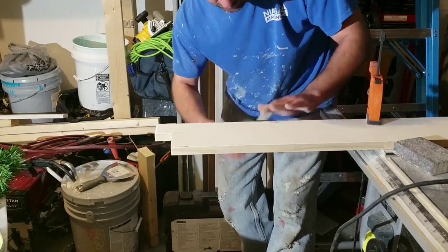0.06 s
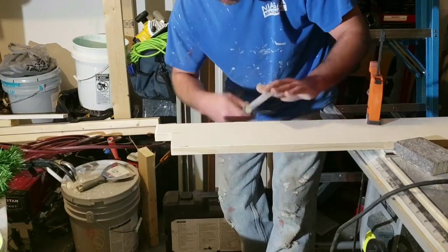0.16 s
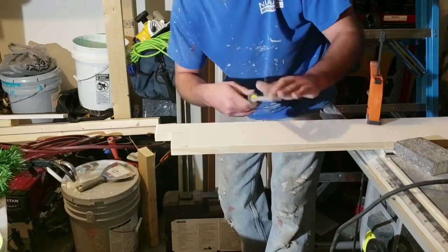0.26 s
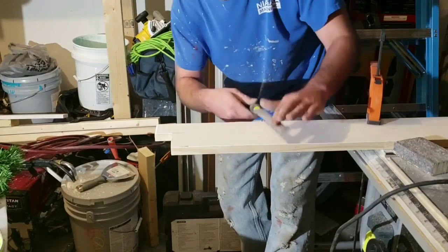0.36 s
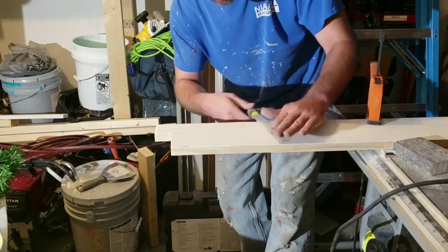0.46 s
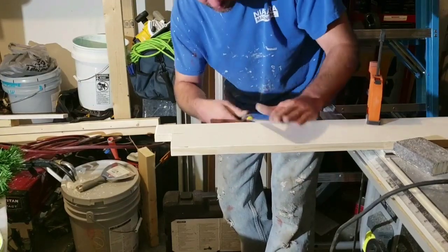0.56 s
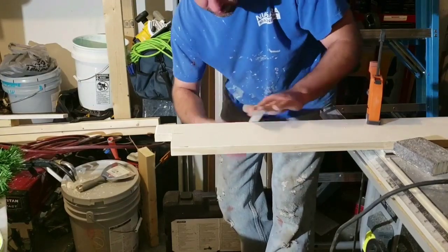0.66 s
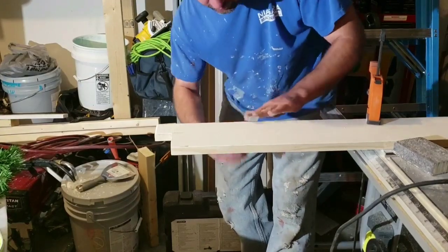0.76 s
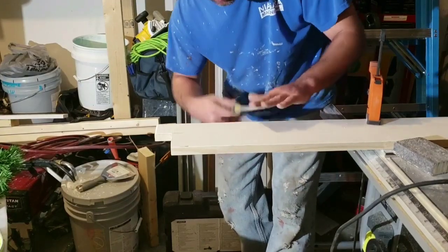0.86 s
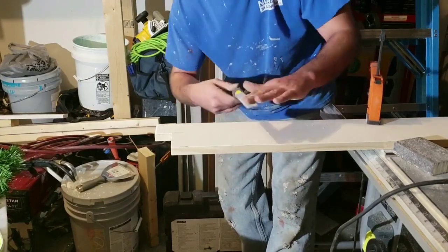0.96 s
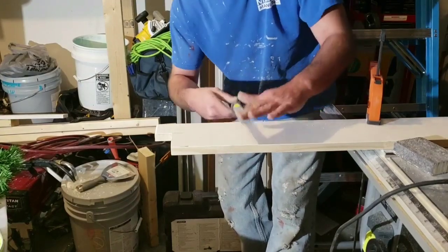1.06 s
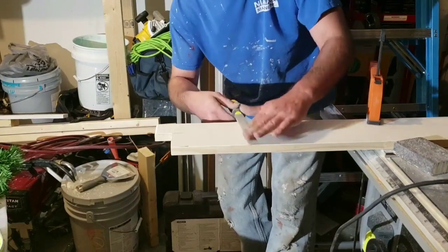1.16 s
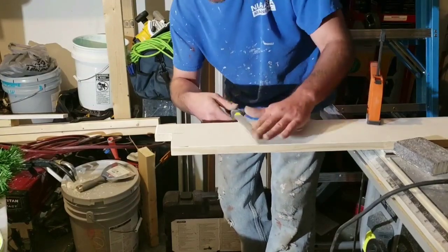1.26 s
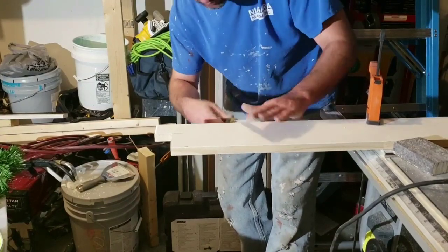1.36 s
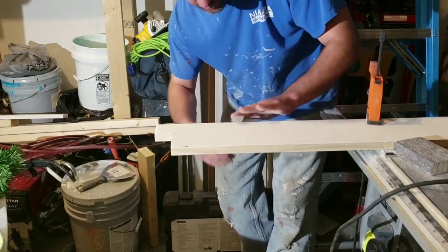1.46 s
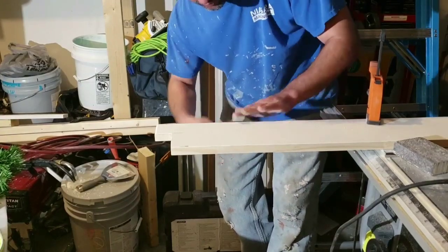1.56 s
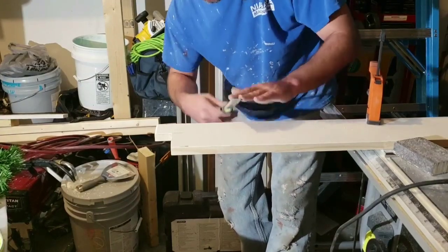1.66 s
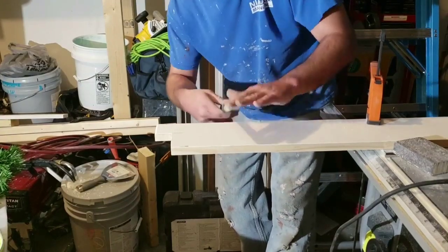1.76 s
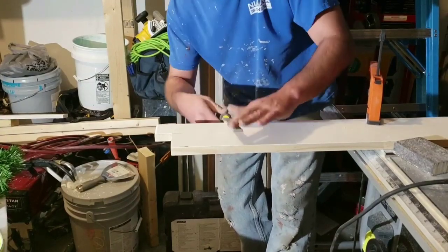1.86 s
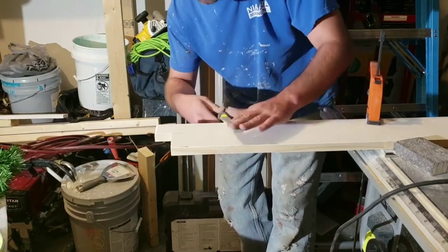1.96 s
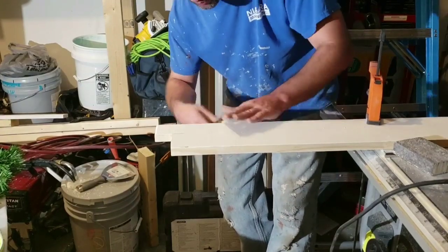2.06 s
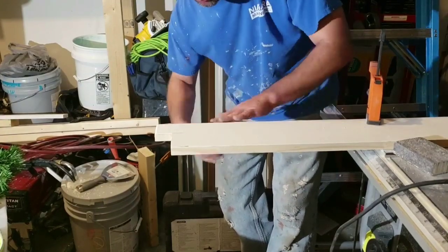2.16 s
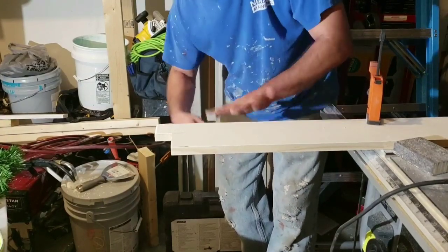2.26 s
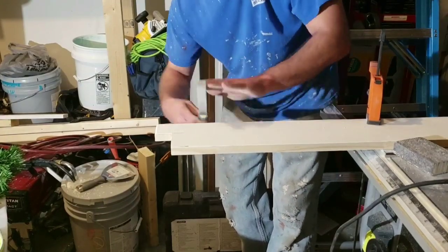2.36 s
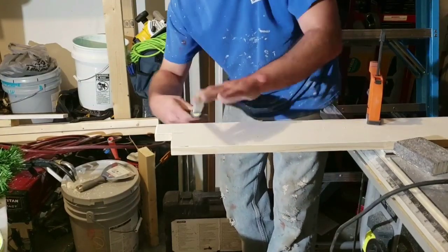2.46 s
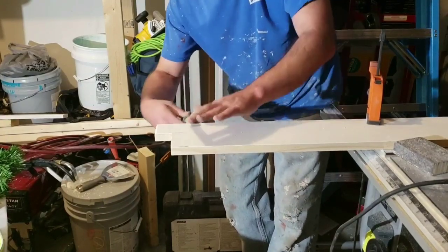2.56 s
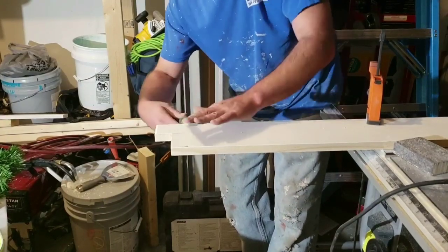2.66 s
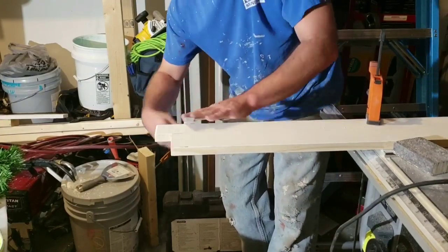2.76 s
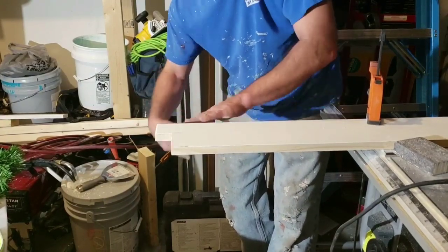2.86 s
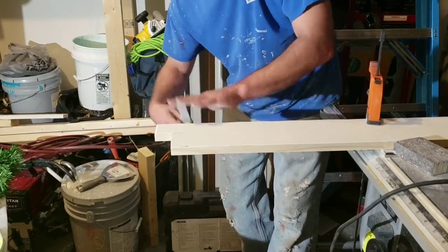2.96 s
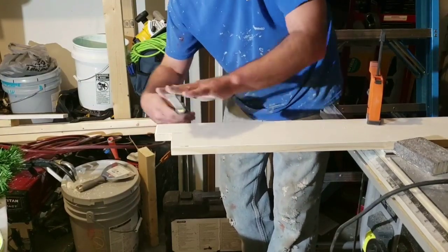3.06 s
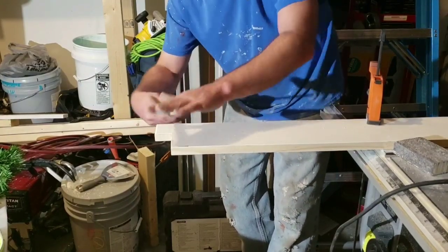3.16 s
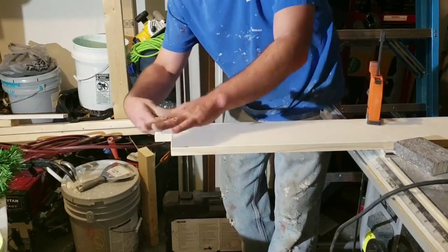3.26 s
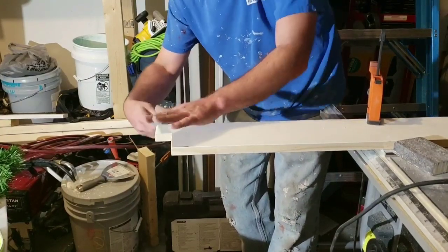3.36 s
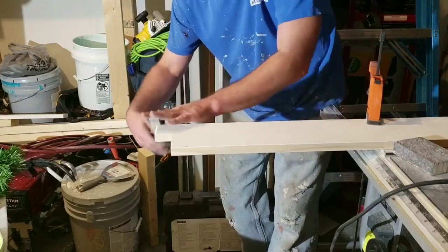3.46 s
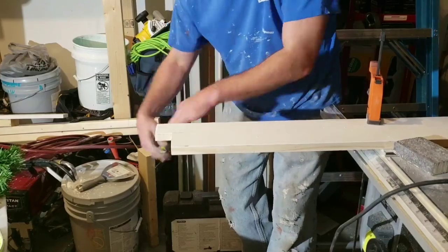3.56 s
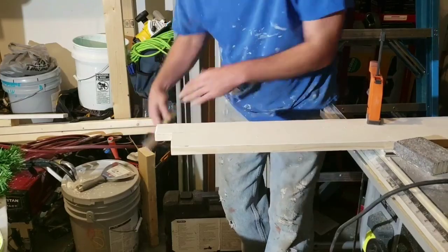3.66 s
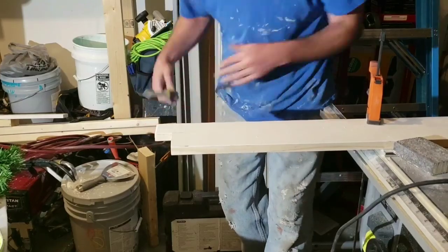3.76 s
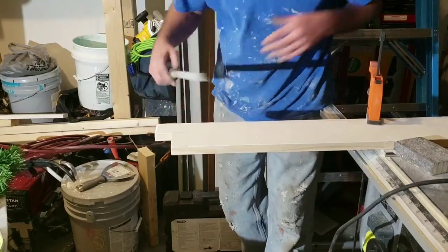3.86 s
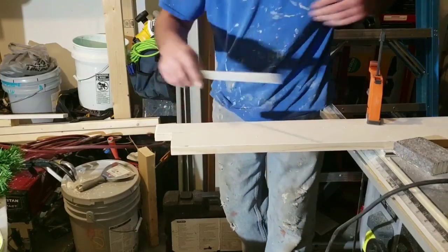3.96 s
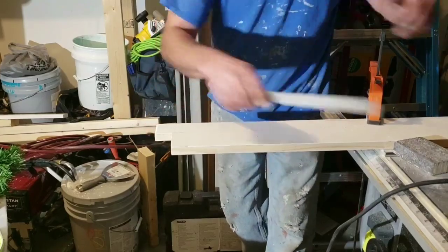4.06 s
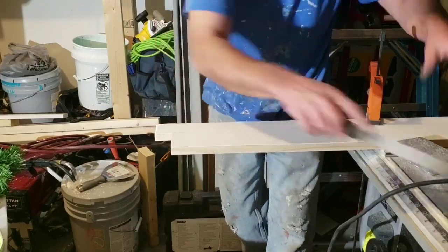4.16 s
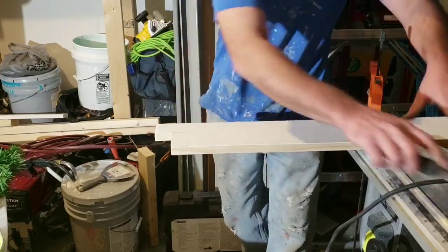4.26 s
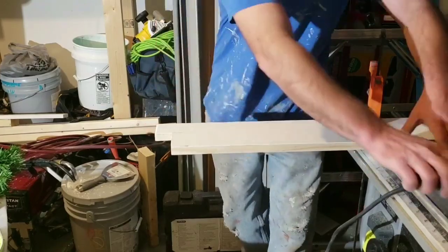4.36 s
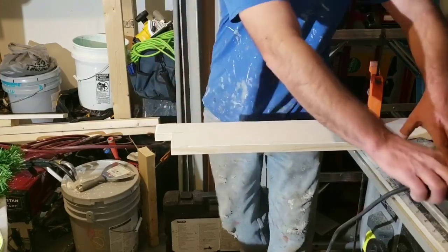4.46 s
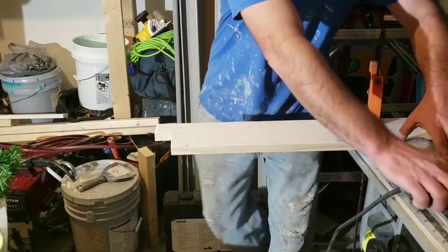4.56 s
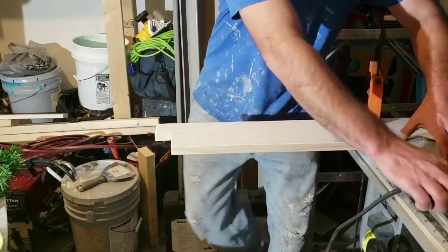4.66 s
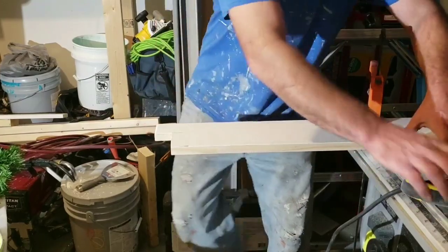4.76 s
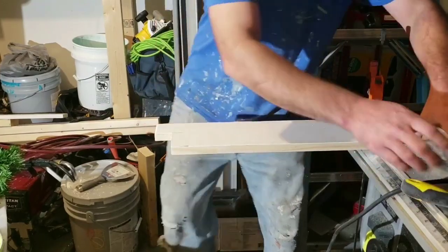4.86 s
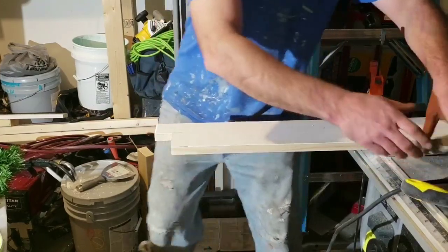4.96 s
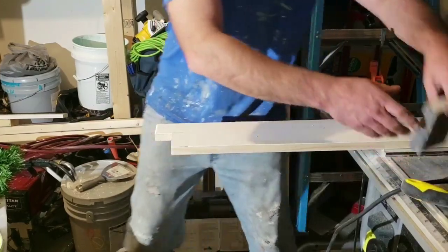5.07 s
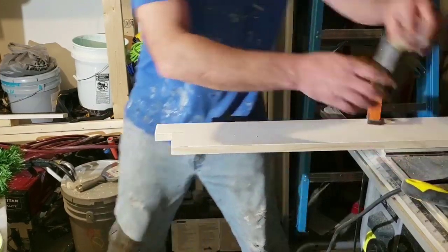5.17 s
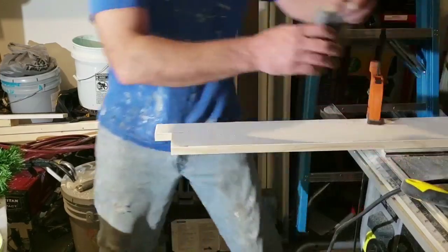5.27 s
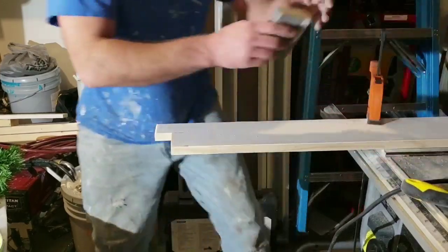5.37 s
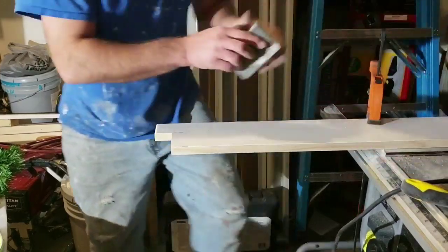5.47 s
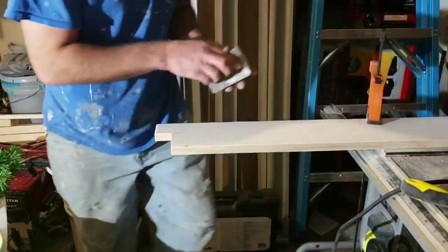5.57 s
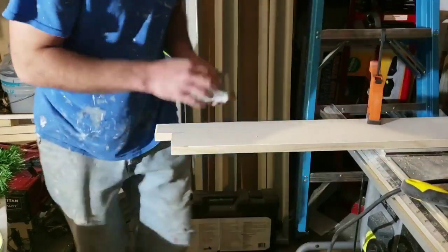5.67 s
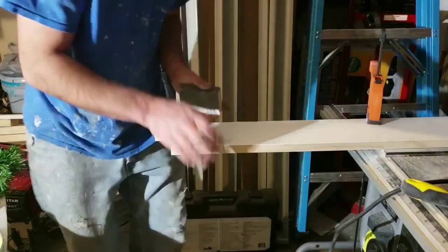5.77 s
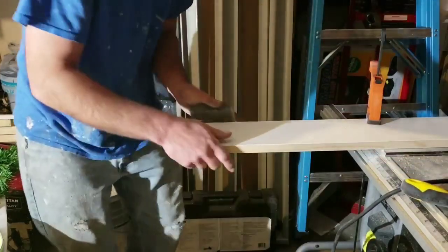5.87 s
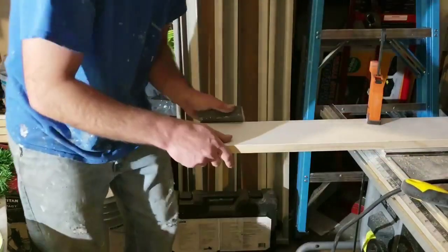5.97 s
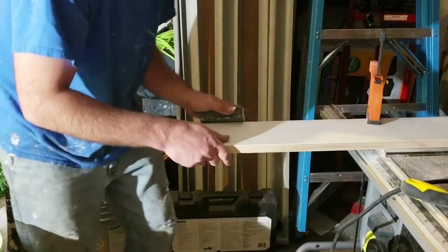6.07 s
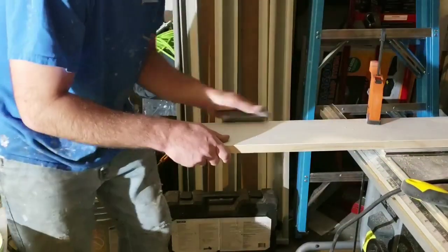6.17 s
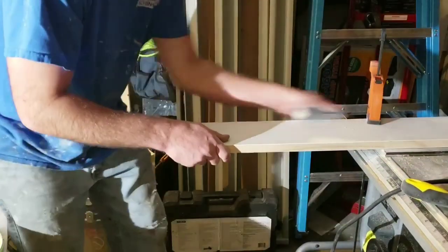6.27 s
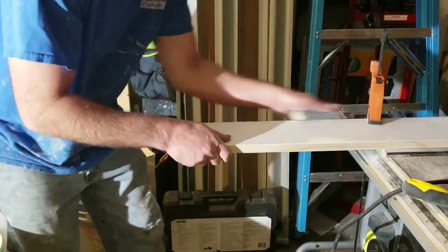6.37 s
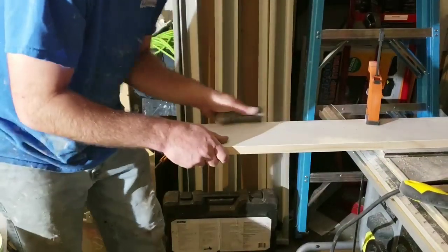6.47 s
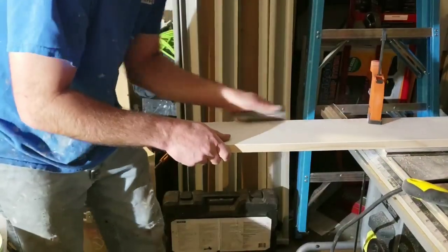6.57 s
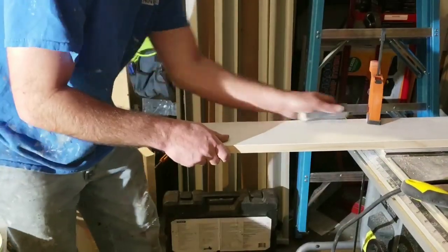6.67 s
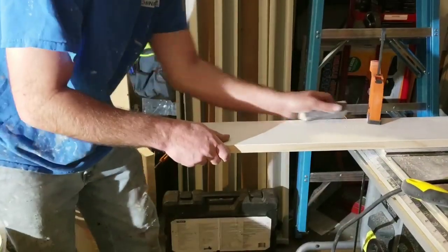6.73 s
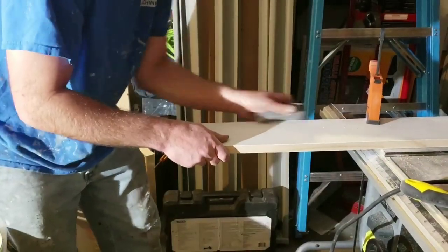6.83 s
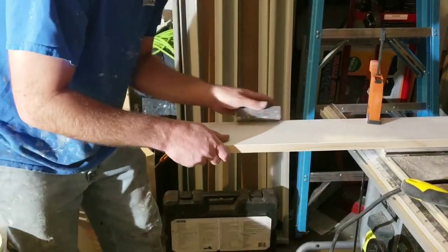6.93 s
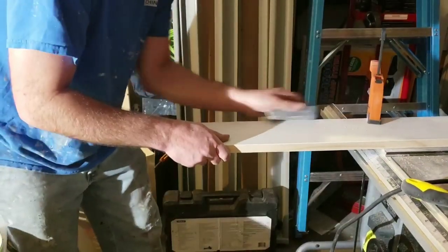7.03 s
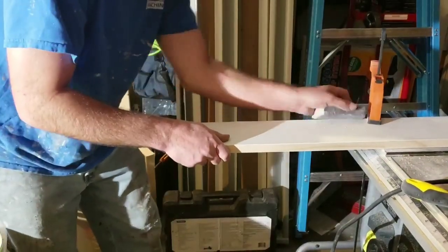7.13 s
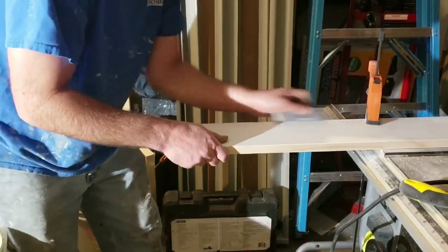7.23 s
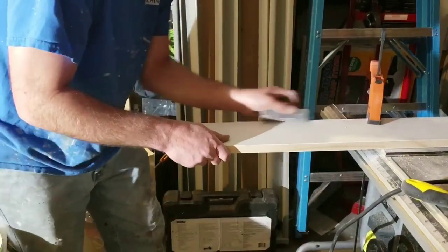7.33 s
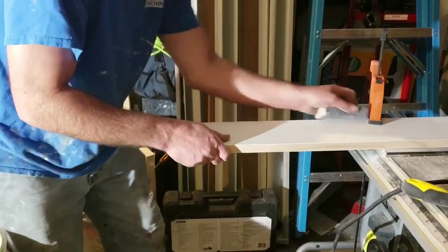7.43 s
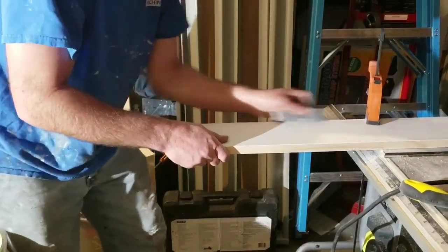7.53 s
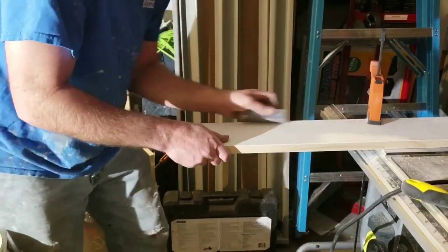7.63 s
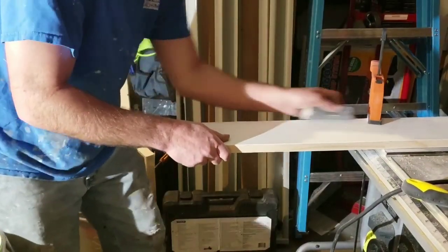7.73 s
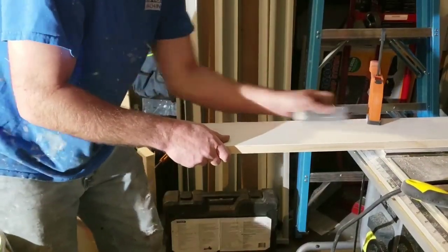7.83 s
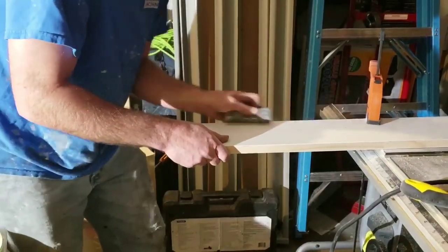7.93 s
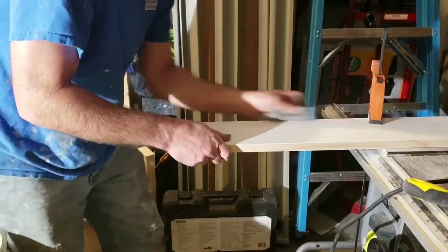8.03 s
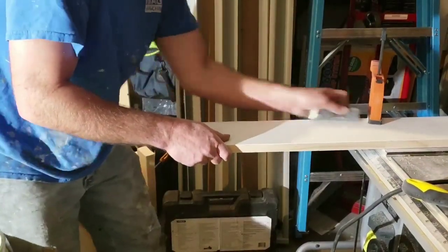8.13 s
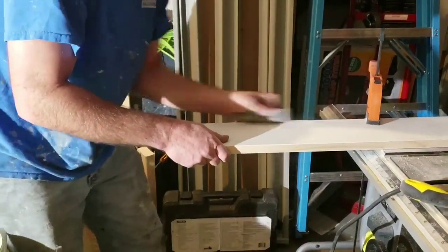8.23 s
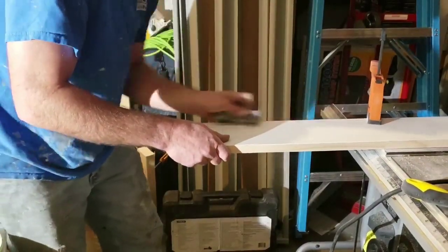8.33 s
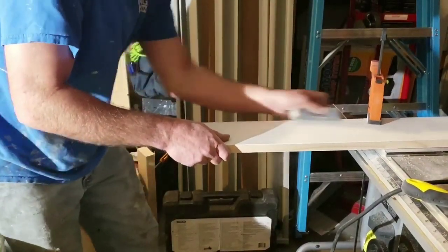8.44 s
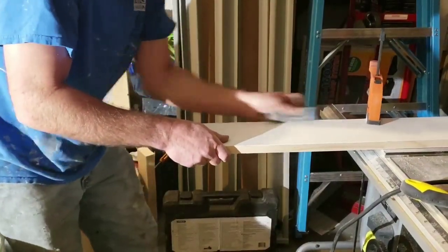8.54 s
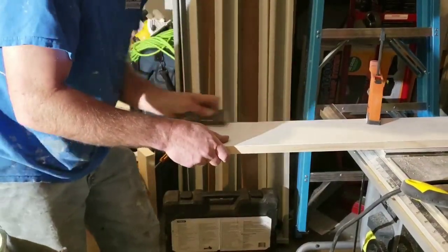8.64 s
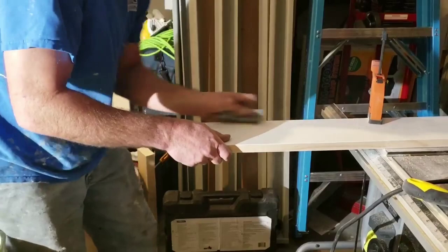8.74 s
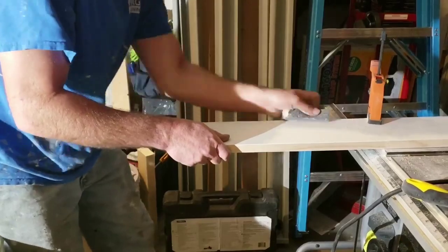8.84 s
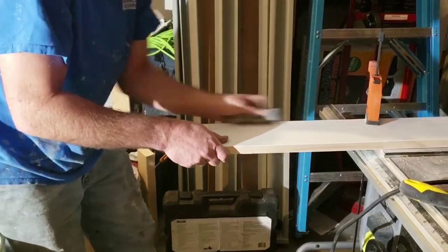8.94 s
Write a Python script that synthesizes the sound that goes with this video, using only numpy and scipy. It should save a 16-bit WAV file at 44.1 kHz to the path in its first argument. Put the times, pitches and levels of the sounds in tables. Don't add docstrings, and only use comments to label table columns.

```python
import sys
import numpy as np
from scipy import signal
from scipy.fft import rfft, irfft
from scipy.io import wavfile
from scipy.ndimage import uniform_filter1d

SR = 44100
rng = np.random.default_rng(int(sys.argv[2]) if len(sys.argv) > 2 else 0)


def generate_wav(signal):
    frames = np.transpose(np.atleast_2d(signal))
    scaled = np.clip(frames, -1, 1) * 32767
    pcm = np.round(scaled).astype(np.int16)
    wavfile.write(sys.argv[1], SR, pcm)


def attenuation_scalar(level_db):
    decades = np.asarray(level_db, float) / 20
    return 10 ** decades


N = 396889


def unit(x):
    return x / np.sqrt(np.mean(x ** 2))


def noise():
    return rng.standard_normal(N)


def columns(tables, rest_db=-90):
    rows = []
    for table in tables:
        first, last = table[0], table[-1]
        rows += [(first[0] - .01, rest_db, *first[2:]), *table, (last[0] + .02, rest_db, *last[2:])]
    s, *values = np.transpose(rows)
    return [np.interp(np.arange(N) / SR, s, v) for v in values]


def swells(events, slope_db=-24):
    t = np.arange(N) / SR
    total = 0
    for s, rise, fall, db in events:
        away = np.minimum(np.maximum((s - t) / rise, (t - s) / fall), 4)
        total = total + attenuation_scalar(db + slope_db * away)
    return total


def colour(x, points):
    hz, db = np.transpose(points)
    grid_hz = np.linspace(1, SR / 2, 4097)
    cep = irfft(np.log(attenuation_scalar(np.interp(np.log(grid_hz), np.log(hz), db))))
    cep[1:4096] *= 2
    cep[4097:] = 0
    return signal.oaconvolve(x, irfft(np.exp(rfft(cep)))[:4096])[:N]


def ring(x, modes):
    total = 0
    for k, (hz, width, db) in enumerate(modes):
        total = total + (-1) ** k * attenuation_scalar(db) * signal.lfilter(*signal.iirpeak(hz, hz / width, SR), x)
    return total


def band(x, lo_hz, hi_hz, order=2):
    return signal.sosfilt(signal.butter(order, [lo_hz, hi_hz], "band", fs=SR, output="sos"), x)


def lift(x, lo_hz, hi_hz, db):
    sos = signal.butter(2, [lo_hz, hi_hz], "band", fs=SR, output="sos")
    return x + (attenuation_scalar(db) - 1) * signal.sosfiltfilt(sos, x)


def walk(rate):
    k = int(SR / rate)
    steps = np.repeat(rng.standard_normal(N // k + 1), k)
    return unit(uniform_filter1d(uniform_filter1d(steps, k), k)[:N])


def grains(scatter_db, flicker_db, rate):
    return unit(noise() * attenuation_scalar(scatter_db * rng.exponential(size=N) + flicker_db * walk(rate)))


def blows(events, soft_s):
    x = np.zeros(N)
    for s, db in events:
        x[int(s * SR)] = attenuation_scalar(db)
    push = np.sin(np.pi * np.arange(0, soft_s, 1 / SR) / soft_s)
    return signal.oaconvolve(x, push)[:N]


def burst(pushes, t60_s):
    return noise() * signal.lfilter([1], [1, -attenuation_scalar(-60 / t60_s / SR)], pushes)


# pitch_hz, width_hz, level_db
PLANK_LOW = [(249, 47, -6.5), (266, 27.7, -0.5), (339, 61.4, -0.5), (473, 83, -2.5), (605, 104, -2),
             (687, 39, 1.5), (750, 30, 0.5), (872, 72, -3)]


def board(force):
    return band(ring(force, PLANK_LOW), 170, 1250, order=4)


# pitch_hz, width_hz, level_over_scratch_db
PLANK_HIGH = [(1316, 20, 0), (1885, 45, 2.5), (2112, 43, 4.5), (2334, 110, 3), (2510, 110, -12),
              (2865, 15, 5.5), (3050, 50, -7), (3630, 22, 7), (3850, 67, -5.5), (4210, 19, 8.5),
              (4640, 49, -4), (6170, 20, 2), (6700, 210, 1)]


def scratch(x, points, place, ring_db):
    x = colour(x, points)
    modes = 0
    for k, mode in enumerate(PLANK_HIGH):
        modes = modes + (-1) ** k * ring(x * np.cos(np.pi * (k + 6) * place), [mode])
    return unit(x + attenuation_scalar(ring_db) * modes)


BITE_S, LIFT_S, LIFT_DB, SLIDE_OFF_S, SLIDE_OFF_DB = 0.018, 0.009, -17, 0.12, -43.5
REST_LOW_DB, REST_UPPER_DB, REST_GRIT_DB = 2.5, -1.5, -6.5
TIP_LOW_DB, TIP_UPPER_DB = 2.5, -9.5


def stroke(times, grip, tone):
    down, push, full, off, db = times
    rest, bite, *held = grip
    low, upper, grit = held
    tip_db = db + tone[4]
    tip_upper = upper + TIP_UPPER_DB
    resting = (REST_LOW_DB, REST_UPPER_DB, REST_GRIT_DB)
    return [(down, rest, *resting),
            (push, rest, low, upper, REST_GRIT_DB),
            (push + BITE_S, bite, *held),
            (full, db, *held),
            (off - LIFT_S, tip_db, *held),
            (off, tip_db, low, tip_upper, grit),
            (off + LIFT_S, db + LIFT_DB, low + TIP_LOW_DB, tip_upper, grit),
            (off + LIFT_S + SLIDE_OFF_S, db + SLIDE_OFF_DB, *resting)]


# set_down_s, push_start_s, full_bite_s, lift_off_s, tearing_at_full_bite_db
STROKES = [
    (-.2, -0.047, 0.094, 0.093, -21),
    (0.549, 0.658, 0.75, 0.85, -24.5),
    (1.305, 1.404, 1.452, 1.6033, -25),
    (2.016, 2.048, 2.19, 2.268, -24),
    (2.715, 2.758, 2.85, 2.9175, -23.5),
    (3.38, 3.406, 3.532, 3.6, -24),
    (3.66, 3.693, 3.8, 3.865, -54.5),
]
# resting_scrape_db, first_bite_db, low_plank_db, upper_plank_db, grit_db
GRIP = [(-50, -25.5, -3.5, -3.5, 0), (-44.5, -37.5, -1, -7.5, -.5), (-54, -35.5, -4, -6, 0.5),
        (-47, -42, -3, -4.5, -1), (-43.5, -42.5, 2.5, -4.5, 0), (-47, -41, -2, -2, 1),
        (-58, -52.5, -15, -9, -1.5)]
# place_along_plank (0-1), lowest_mode_db, middle_db, top_db, extra_push_at_tip_db
TONE = [(.62, 3, 2, -3, -1), (.6, -1.5, 1, -1, 1.5), (.53, 1, 0, 1.5, 0), (.46, 0.5, -0.5, 1, -1.5),
        (.38, 3, 3.5, 2.5, -1), (0.3, 2, 0.5, 0, 3), (.3, 0, -2, 3.5, 0)]
# pitch_hz, level_db (per Hz)
TEAR = [(530, -27), (900, -7), (1030, -7.5), (1300, -5.5), (2060, -5.5), (3360, -15.5), (3730, -12.5),
        (6000, -18.5), (6520, -16.5), (8760, -24.5), (13900, -14), (14800, -24.5), (15300, -53)]
TRAVEL_PER_S = 0.093
PLANK_SWAY_DB = 1.5


def rasp():
    parts = np.array([columns([stroke(*row)]) for row in zip(STROKES, GRIP, TONE)])
    loudest = np.argmax(parts[:, 0], axis=0)
    tear_db, low_db, upper_db, grit_db = np.take_along_axis(parts, loudest[None, None], axis=0)[0]
    slips = grains(2.2, 1.8, 90)
    place, lowest_db, middle_db, top_db, _ = uniform_filter1d(np.transpose(TONE)[:, loudest], size=1024)
    tear = scratch(slips, TEAR, place + TRAVEL_PER_S * (np.arange(N) / SR % .7), -1.5)
    tear = lift(tear, 1700, 2700, middle_db)
    tear = lift(tear, 9500, 15000, top_db)
    grit = band(tear, 2540, 12000)
    out = attenuation_scalar(-4.0 + tear_db) * (tear - grit + attenuation_scalar(grit_db + 5.0) * grit)
    low = board(slips * attenuation_scalar(tear_db + low_db + PLANK_SWAY_DB * walk(24.99)))
    upper = board(slips * attenuation_scalar(tear_db + upper_db + PLANK_SWAY_DB * walk(24.99)))
    low = lift(band(low, 209, 517, order=3), 180, 260, lowest_db)
    return out + attenuation_scalar(17.0) * low + attenuation_scalar(18.0) * band(upper, 540, 1000)


# centre_s, half_length_s, pitch_hz, level_db
CHATTER = [(.005, 0.017, 300, -24.5), (0.108, 0.018, 300, -21.5), (0.097, 0.011, 890, -25.5),
           (0.784, 0.015, 334, -35), (0.805, 0.044, 864, -22), (0.846, 0.01, 324.3, -16),
           (0.847, 0.021, 680, -27), (1.502, 0.029, 355.3, -29), (1.536, 0.018, 850, -31),
           (1.549, 0.026, 347.5, -29.5), (1.615, 0.011, 292.6, -24.5), (2.21, 0.042, 339, -21),
           (2.857, 0.075, 341.4, -31), (3.527, 0.027, 610, -24.5), (3.548, 0.037, 324, -31.5),
           (3.607, 0.023, 608.6, -28), (3.611, 0.028, 331, -37.5)]


def chatter():
    out, t = np.zeros(N), np.arange(N) / SR
    wobble = np.cumsum(1 + 0.0206 * walk(80)) / SR
    for s, length, hz, db in CHATTER:
        near = slice(max(int((s - length) * SR), 0), int((s + length) * SR))
        swell = np.cos(np.pi / 2 * (t[near] - s) / length) ** 2
        out[near] += attenuation_scalar(db) * swell * np.sin(2 * np.pi * hz * wobble[near])
    return out


# turn_s, scratch_at_turn_db, fastest_point (0-1 of the pass), scratch_there_db, plank_db
PASSES = [(6.2, -68, 0.79, -22, -48), (6.477, -47, 0.56, -26.5, -45), (6.656, -48.5, 0.38, -27, -42),
          (6.873, -49, 0.53, -32, -46.5), (7.095, -62, 0.56, -27.5, -52), (7.307, -47.5, 0.46, -29, -52),
          (7.46, -43.5, 0.69, -29.5, -43.5), (7.609, -49, 0.49, -27, -47.5), (7.771, -44, 0.45, -29, -50.5),
          (7.94, -50.5, 0.57, -27.5, -50), (8.113, -49.5, 0.4, -28, -51.5), (8.284, -46, 0.5, -28.5, -52),
          (8.461, -53, 0.28, -28.5, -51.5), (8.633, -44.5, 0.67, -26.5, -49.5),
          (8.822, -54.5, 0.22, -28.5, -48), (9.01, -49, .5, -40, -55)]
PASS_TOP = [-2.5, 1.5, -1.5, -1.5, -1.5, -1, -1, -1, 0, 0, 0.5, 0, 2.5, 1, 3, 0]
LEAD_S = 0.0067
PASS_FULLNESS, PLANK_DIP_DB, STANDSTILL_DB = 0.61, 2.5, -11
SPONGE_PLACE, SWEEP = 0.5584, 0.04


def passes():
    turn, turn_db, fastest, fast_db, plank_db = np.transpose(PASSES)
    t = np.arange(N) / SR + LEAD_S
    k = np.clip(np.searchsorted(turn, t) - 1, 0, len(turn) - 2)
    on = t > turn[0]
    along = np.clip((t - turn[k]) / np.diff(turn)[k], 0, 1)
    nearness = np.minimum(along / fastest[k], (1 - along) / (1 - fastest[k]))
    speed = np.sin(np.pi / 2 * nearness) ** PASS_FULLNESS
    slow_db = np.where(along < fastest[k], turn_db[k], turn_db[k + 1])
    rubbing = on * attenuation_scalar(slow_db + (fast_db[k] - slow_db) * speed + STANDSTILL_DB * (1 - speed) ** 4)
    plank = attenuation_scalar(uniform_filter1d(plank_db[k], size=2048) + PLANK_DIP_DB * speed ** 4)
    plank = on * plank * np.clip(along * 4 + k, 0, 1)
    place = SPONGE_PLACE + SWEEP * np.cos(np.pi * (k + along))
    top_db = uniform_filter1d(on * np.array(PASS_TOP, float)[k], size=2048)
    return speed, rubbing, plank, place, top_db


# peak_s, rise_s, fall_s, scratch_db, plank_minus_scratch_db
HANDLING = [
    (4.93, .05, .1, -66, 15.5),
    (5.09, 0.088, .08, -51, 2),
    (5.147, .015, 0.017, -47, -7.5),
    (5.248, .04, .06, -65, -5),
    (5.414, 0.034, 0.07, -49.5, -3),
    (5.78, .03, 0.054, -59, 16),
    (5.93, 0.066, 0.024, -44, -8.5),
    (6.095, 0.075, 0.067, -52.5, -2.5),
]
# peak_s, rise_s, fall_s, level_db
PRESSES = [(8.41, 0.06, 0.041, -28)]
# pitch_hz, level_db (per Hz)
GRIT = [(530, -21), (900, -4), (1280, -8.5), (1990, -2.5), (2350, -3), (3360, -3.5), (4680, -2), (6000, -5),
        (6750, -2.5), (8760, -8.5), (13900, 1), (14800, -5.5), (15300, -29)]
SPONGE_RING_DB, COARSE_TURN_DB, COARSE_FAST_DB = -7, -6, -7.5
HANDS_DB, HANDS_COARSE_DB, HANDS_TOP_DB = -69, -8, -3.5


def sponge():
    speed, rubbing, plank, place, top_db = passes()
    held = attenuation_scalar(columns([[(4.9, HANDS_DB), (6.2, HANDS_DB)]], -140)[0])
    hands = held + swells([row[:4] for row in HANDLING])
    bumps = swells([(s, rise, fall, db + rel) for s, rise, fall, db, rel in HANDLING])
    plank = plank * attenuation_scalar(2.0 * walk(15)) + bumps
    moving_db = COARSE_TURN_DB + (COARSE_FAST_DB - COARSE_TURN_DB) * speed
    coarse_db = np.where(rubbing > 0, moving_db, HANDS_COARSE_DB)
    slips = grains(1.8, .9, 60)
    hiss = lift(scratch(slips, GRIT, place, SPONGE_RING_DB), 8500, 17000, top_db)
    coarse = band(hiss, 800, 2500)
    murmur = unit(board(noise()) + 0.46 * band(noise(), 250, 1400))
    hands_top = (attenuation_scalar(HANDS_TOP_DB) - 1) * hands * band(hiss, 6000, 16000)
    rub = (rubbing + hands + swells(PRESSES)) * (hiss - coarse + attenuation_scalar(coarse_db + 6.5) * coarse)
    return attenuation_scalar(-1.5) * (rub + hands_top) + attenuation_scalar(-6.5) * plank * murmur


# start_s, peak_db, click_minus_peak_db
TAPS = [(0.541, -20, -3), (1.3005, -23, -11.5), (1.419, -25, -2.5), (1.986, -14, -17.5),
        (2.693, -29.5, 1.5), (3.372, -24.5, -2), (5.223, -40.5, -14), (5.768, -38, -1),
        (6.092, -35.5, -13.5), (6.43, -10.5, -8), (6.72, -21.5, -1), (8.14, -26.5, -4)]


def taps():
    knock = board(blows([(s, db) for s, db, _ in TAPS], 0.00029)) * attenuation_scalar(12.5)
    click = burst(blows([(s, db + rel) for s, db, rel in TAPS], .0001), 0.012)
    click = band(click, 900, 4100) + 0.33 * band(click, 3700, 7400)
    return knock + attenuation_scalar(-8.0) * (click + ring(click, PLANK_HIGH))


# start_s, peak_db, thud_minus_peak_db, extra_treble_db
DROPS = [
    (4.5043, -3.5, -9.5, 3),
    (4.5147, -25, 6.5, 0),
    (4.5292, -17.5, -15, 10.5),
    (4.5442, -30, -16, 7),
    (4.56, -13, -7, 1),
    (4.5776, -23.5, -1, -1.5),
    (4.5998, -27.5, -0.5, -1),
    (4.6891, -37.5, 10.5, -6),
    (4.7052, -14.5, -9, -2.5),
    (4.874, -30, -9, -13),
]
# pitch_hz, width_hz, level_db
BENCH = [(258, 19, -4), (300, 39, -7.5), (385.3, 19, 5), (630, 42, -10), (730, 43, -4.5), (940, 51, -30.5),
         (380, 7, -1.5)]
# pitch_hz, width_hz, level_db
STEEL = [(1629, 19, -0.5), (1835, 32, -2.5), (1895, 11, -6), (2380, 48, -7), (2510, 30, -12),
         (2880, 25, -21), (3380, 21, -5), (3740, 22, -9.5), (6200, 25, -15), (7235, 25, -23),
         (9900, 28, -21)]
# pitch_hz, level_db (per Hz)
CRACK = [(530, -11), (900, -1.5), (1130, -16), (1710, -4), (1990, -16.5), (2160, -2), (6290, -9),
         (12100, -16), (14600, -18.5), (15300, -44.5)]


def drops():
    thump = blows([(s, db + rel) for s, db, rel, _ in DROPS], 0.00053)
    thud = band(ring(thump, BENCH), 240, 5000, order=3) * attenuation_scalar(14.5)
    push = blows([row[:2] for row in DROPS], .0001)
    bright = blows([(s, db + treble) for s, db, _, treble in DROPS], .0001)
    rattle = band(colour(burst(push, 0.099), CRACK), 360, 4500)
    rattle = rattle + band(colour(burst(bright, 0.053), CRACK), 4500, 16000)
    steel = ring(burst(push, 0.0055), STEEL)
    return thud, attenuation_scalar(-11.5) * rattle + attenuation_scalar(6.0) * steel


# peak_s, rise_s, fall_s, level_db
SLEEVES = [
    (.42, 0.36, .2, -85.5),
    (1.06, .1, .3, -74),
    (1.83, 0.17, .2, -72),
    (2.57, .08, .15, -67.5),
    (3.31, 0.09, .12, -68.5),
    (4.0, .2, 0.25, -65.5),
    (4.245, 0.055, 0.3, -65.5),
    (4.47, 0.1, .03, -62.5),
    (4.8, .2, .15, -62.5),
]


def sleeves():
    cloth = band(colour(grains(1.2, 2.2, 18), GRIT), 3000, 15500)
    return unit(lift(cloth, 11000, 14500, 4.0)) * swells(SLEEVES) * attenuation_scalar(-3.0)


# time_s, left_later_by_s
LAG = [(0, .00003), (2.4, .00003), (2.6, .0004), (4.9, 0.00042), (5.6, 0.00004), (9, 0.00003)]
# time_s, left_minus_right_db
PAN = [(0, 0), (2.5, 0), (3.2, -0.1), (4.4, -0.4), (5, -0.4), (6, 0), (9, 0.5)]
STEP = 2048
LAG_SWAY_S, LAG_SWAY_HZ = .00004, 2.9
ROOM_T60_S, ROOM_TOP_T60_S, ROOM_DB = 0.24, 0.12, 2.5


def room(x):
    count, t = N // STEP + 1, np.arange(6 * STEP) / SR
    x = np.pad(x, (STEP, 2 * STEP))
    slices = np.array([x[k * STEP:(k + 2) * STEP] for k in range(count)]) * np.hanning(2 * STEP + 1)[:-1]
    slice_s = np.arange(count) * STEP / SR
    lag = np.interp(slice_s, *np.transpose(LAG))
    lag = lag + LAG_SWAY_S * (1 + np.sin(2 * np.pi * LAG_SWAY_HZ * slice_s))
    out = np.zeros((2, (count + 8) * STEP))
    for ear, side_db in enumerate((-.8, .8)):
        changing = rng.standard_normal((count, len(t)))[np.arange(count) // 4]
        tail = 0.56 * rng.standard_normal(len(t)) + changing
        low = signal.lfilter(*signal.butter(1, 3000, fs=SR), tail)
        tail = low * attenuation_scalar(-60 * t / ROOM_T60_S) + (tail - low) * attenuation_scalar(-60 * t / ROOM_TOP_T60_S)
        tail *= np.clip((t - .002) / 0.0011, 0, 1)
        tail *= attenuation_scalar(ROOM_DB) / np.sqrt(np.sum(tail ** 2) / count)
        tail[np.arange(count), (lag * SR * (1 - ear)).astype(int)] += 1
        heard = irfft(rfft(slices, 8 * STEP) * rfft(tail, 8 * STEP)) * attenuation_scalar(side_db)
        for k in range(count):
            out[ear, k * STEP:(k + 8) * STEP] += heard[k]
    pan_db = np.interp(np.arange(N) / SR, *np.transpose(PAN))
    left, right = out[:, STEP:STEP + N] * attenuation_scalar(pan_db * np.array([[.5], [-.5]]))
    side = signal.sosfilt(signal.butter(2, 580, "high", fs=SR, output="sos"), left - right)
    return np.array([left + right + side, left + right - side]) / 2


# pitch_hz, level_db (per Hz)
GARAGE = [(15, -49), (25, -16), (43, -11), (125, -13), (159, -17), (245, -22), (288, -24), (376, -26.5),
          (563, -30.5), (644, -28), (756, -31), (1560, -31), (4220, -49.5), (14100, -54.5), (15300, -57)]
# time_s, level_db
AIR = [(0, 6), (4.4, 4), (5.7, 0.5), (6.2, 7), (9, 0.5)]
# time_s, level_db
RUMBLE = [(0, -57), (2.4, -57.5), (3.4, -56), (4.2, -55.5), (5.2, -65.5), (6.45, -56.5), (9, -57.5)]
# pitch_hz, width_hz, level_db
RUMBLE_MODES = [(54.6, 15, -1), (76, 9.7, -1.5), (98, 16, -5.5)]
# time_s, level_db
HUM = [(0, -55.5), (1.2, -68), (2.5, -55), (3.1, -47), (3.8, -46.5), (4.0, -54.5), (4.3, -49), (4.6, -51),
       (5.6, -56), (5.95, -65), (6.5, -50), (7.1, -63), (9, -61)]
# pitch_hz, level_db
MOTORS = [(193, -69), (237, -65), (377, -72.5), (718, -83.5)]
GARAGE_DB, HUM_HZ = -60, 127


def garage(loud):
    mid, side = (band(colour(noise(), GARAGE), 43, 17000, order=3) for _ in range(2))
    side = 0.21 * side + 0.55 * band(side, 500, 16000, order=1)
    duck = 1 / (1 + np.sqrt(uniform_filter1d(loud ** 2, size=2048) + 1e-12) / attenuation_scalar(-3))
    air_gain = attenuation_scalar(GARAGE_DB + columns([AIR])[0] + 0.63 * walk(1.0)) * duck
    air = air_gain * np.array([mid + side, mid - side]) / mid.std()
    mid, side = (unit(ring(band(noise(), 40, 100), RUMBLE_MODES)) for _ in range(2))
    rumble = np.array([mid + .3 * side, mid - 0.32 * side]) * attenuation_scalar(columns([RUMBLE])[0] + 2.0 * walk(6))
    turn = 2 * np.pi * np.cumsum(HUM_HZ * (1 + 0.012 * walk(3.7))) / SR
    hum_db = columns([HUM])[0]
    hum = np.sin([turn + 0.29, turn - .4]) * attenuation_scalar(hum_db + 1.5 + 1.8 * walk(9.1))
    lines = 0
    for hz, db in MOTORS:
        lines = lines + attenuation_scalar(db + 0.28 * (hum_db + 59) + 2.0 * walk(0.78)) * np.sin(turn * hz / HUM_HZ)
    return air + rumble + hum + lines


def scene():
    tools, (thud, steel) = rasp(), drops()
    straight, knocks = chatter() + thud, taps()
    work = room(tools + 0.5 * straight + 0.72 * knocks + sponge() + sleeves() + steel)
    work = work + straight + 0.45 * knocks
    return work + garage(work[0])


# centre_s, half_length_s, bass_db, low_middle_db
HUSH = [(7.22, .045, -21, -3.5), (7.38, .035, -18, -6), (7.562, .025, -18, -5), (7.724, .03, -17, -4),
        (7.856, 0.031, -15, -6), (8.059, .03, -5, -7.5), (8.219, .025, -11, -2), (8.4, .03, -15, -15),
        (8.54, 0.029, -8, -14), (8.738, .04, -22, -19), (8.925, .035, -5, -11)]


def hush(x):
    t = np.arange(N) / SR
    bass_db, middle_db = 0, 0
    for s, half, low, mid in HUSH:
        dip = np.exp(-((t - s) / half) ** 2)
        bass_db = bass_db + dip * low
        middle_db = middle_db + dip * mid
    return lift(lift(x, 115, 340, bass_db), 300, 740, middle_db)


# pitch_hz, firmness (in spreads of chance)
FIRMNESS = [(130, 7), (190, 4), (400, 4), (600, 2.2), (1000, 1.3), (1300, 1), (2300, 1.4), (3300, 1),
            (5500, 1.15), (6900, 1.3), (7500, .7), (8100, -.2), (8700, 1.6), (10500, 1.1), (12000, 2.3)]
TOP_HZ = 14750


def starve(x, per_db=.12, hold=4, per_loud_db=.022):
    hz, _, spec = signal.stft(x, SR, nperseg=2048)
    edges = np.unique(np.cumsum(np.clip(1.038 ** np.arange(120), 3, 11)).astype(int))
    which = np.searchsorted(edges[edges < 700], np.arange(len(hz)))
    count = which.max() + 1
    power = np.array([np.mean(abs(spec[:, which == b]) ** 2, axis=(0, 1)) for b in range(count)])
    sunk_db = 10 * np.log10(power + 1e-16)
    loud_db = sunk_db.mean(axis=0)
    sunk_db -= loud_db
    sunk_db -= np.median(sunk_db, axis=1, keepdims=True)
    both, own = rng.standard_normal((1, *power.shape)), rng.standard_normal((2, *power.shape))
    chance = uniform_filter1d(.92 * both + .39 * own, hold, axis=2) * np.sqrt(hold)
    centre = np.array([hz[which == b].mean() for b in range(count)])
    touchy = np.where(abs(centre - 7700) < 700, 2, 1)[:, None]
    firm = np.interp(centre, *np.transpose(FIRMNESS))[:, None]
    firm = firm + per_db * touchy * np.minimum(sunk_db, 0) + chance
    firm -= per_loud_db * np.where(centre > 7000, -1, 1)[:, None] * (loud_db - np.median(loud_db))
    jump_db = np.diff(10 * np.log10(power.mean(axis=0) + 1e-16))
    firm[:, :, 1:] += np.maximum(jump_db - 4, 0)
    gain = np.clip(8 * firm, .01, 1)[:, which] * np.where(hz < TOP_HZ, 1, attenuation_scalar(-40))[:, None]
    return signal.istft(spec * gain, SR, nperseg=2048)[1][:, :N]


def roll_off(x):
    return signal.sosfilt(signal.butter(12, 15730, fs=SR, output="sos"), x)


def record(dry):
    dry = hush(dry)
    bass = signal.lfilter(*signal.butter(1, 200, fs=SR), dry)
    lean = np.array([[1], [-1]])
    mix = starve(bass * attenuation_scalar(0.71 * lean) + (dry - bass) * attenuation_scalar(-.3 * lean))
    return roll_off(mix)


dry = scene()
out = record(dry)
generate_wav(out)
```